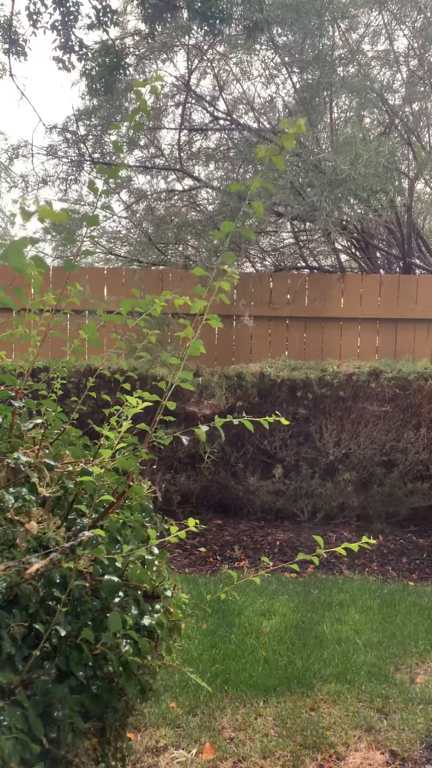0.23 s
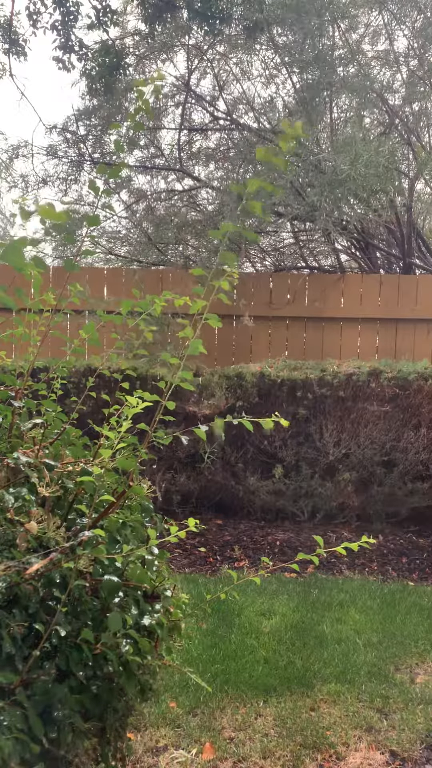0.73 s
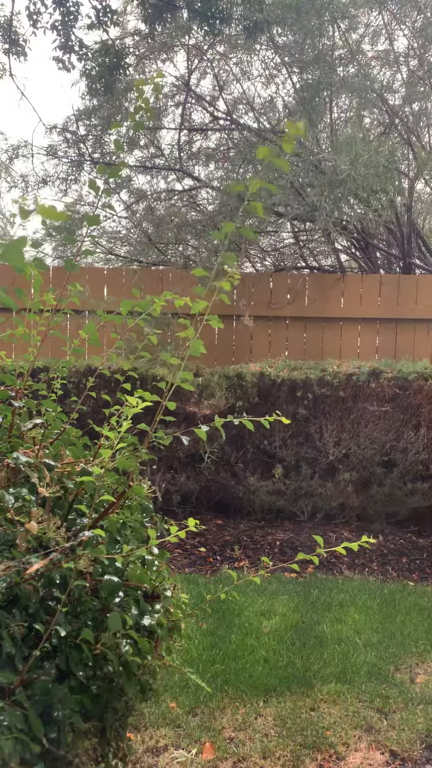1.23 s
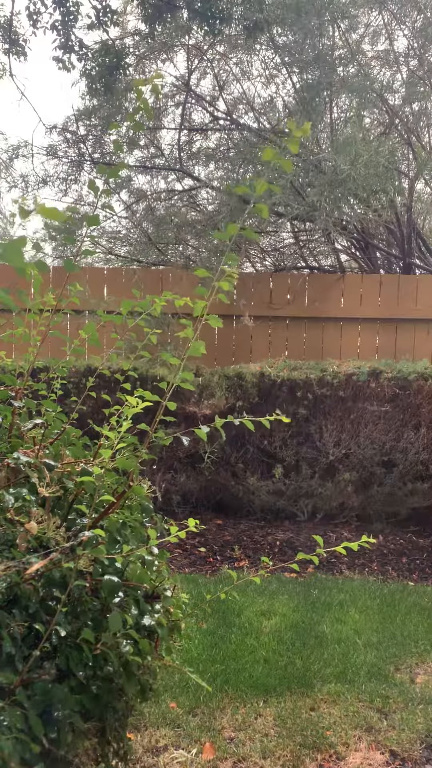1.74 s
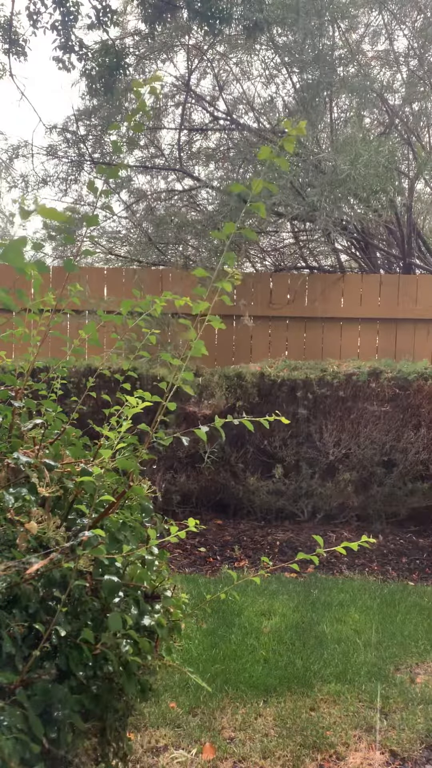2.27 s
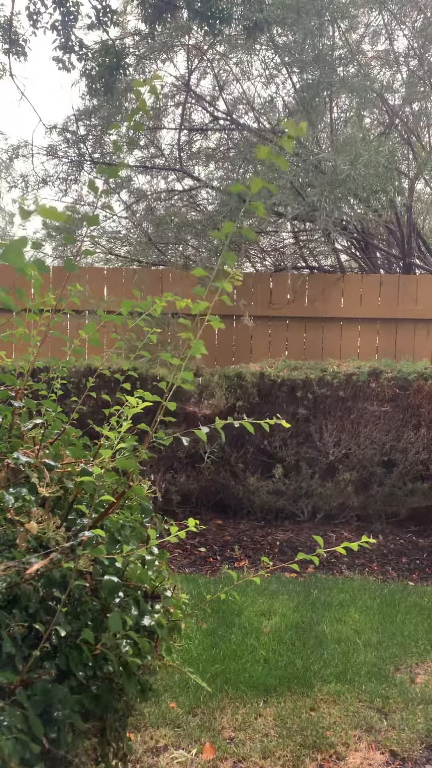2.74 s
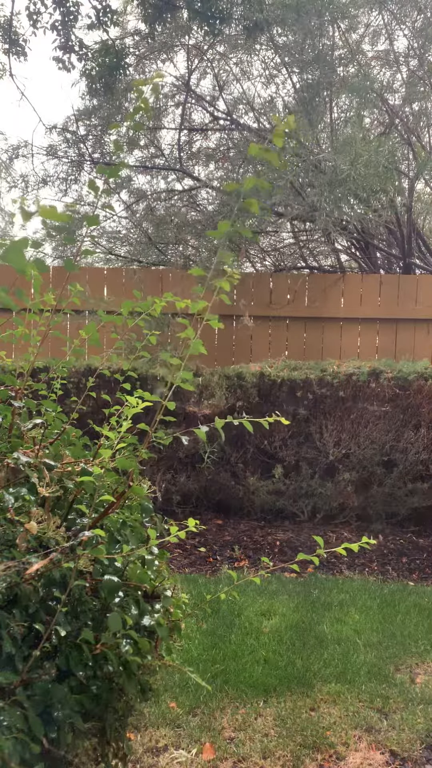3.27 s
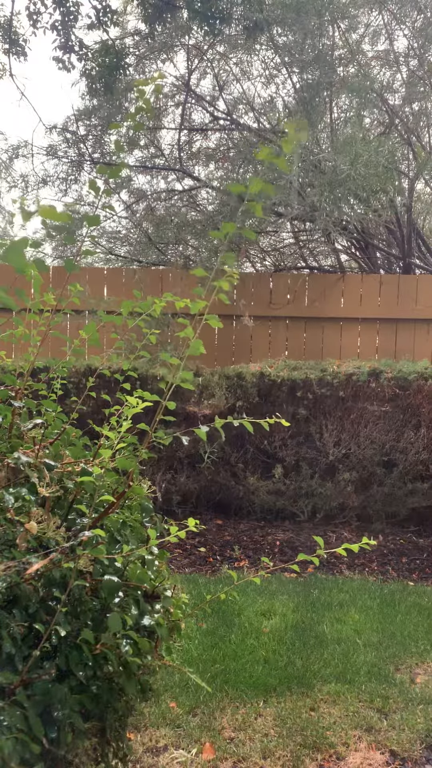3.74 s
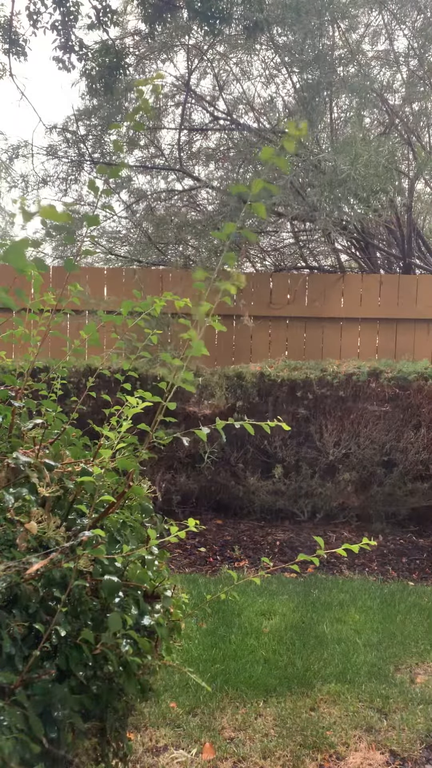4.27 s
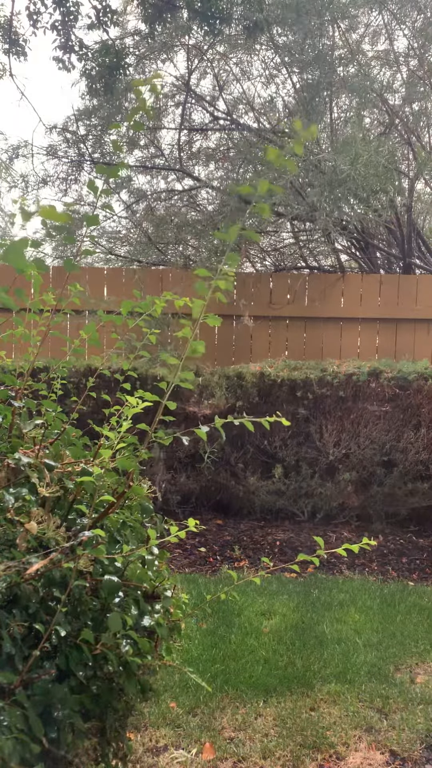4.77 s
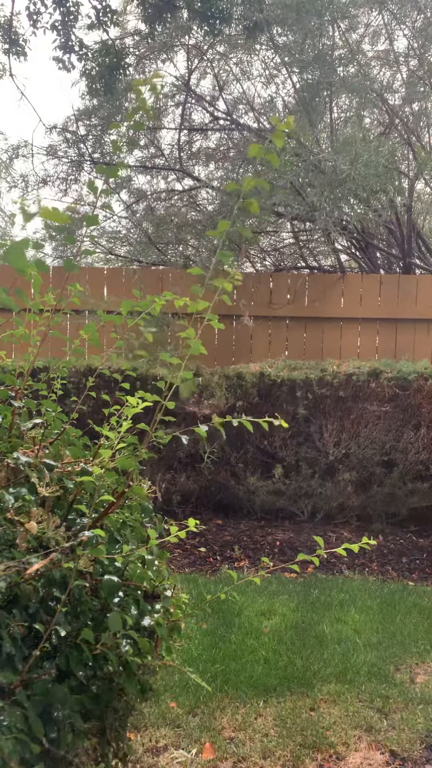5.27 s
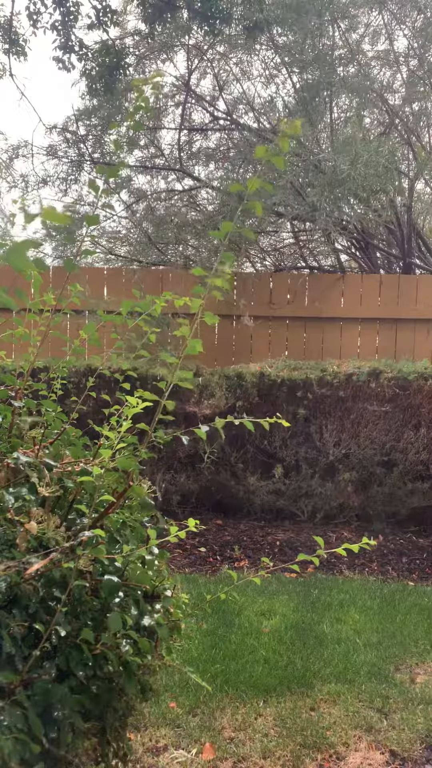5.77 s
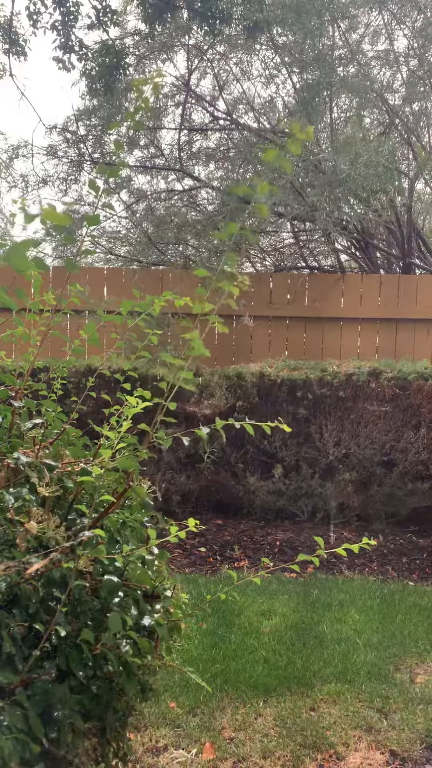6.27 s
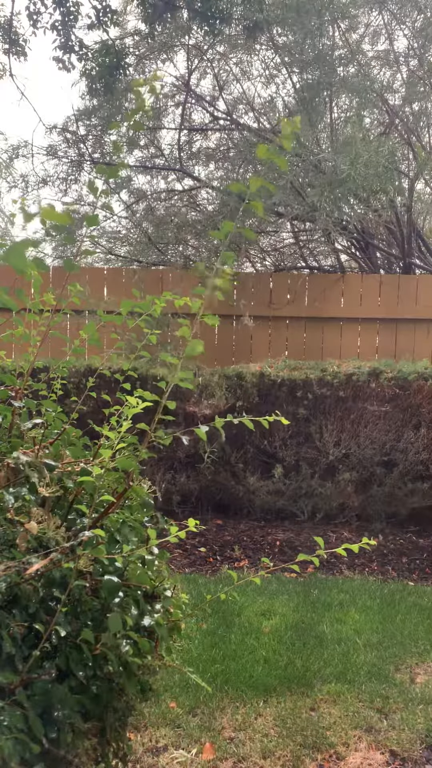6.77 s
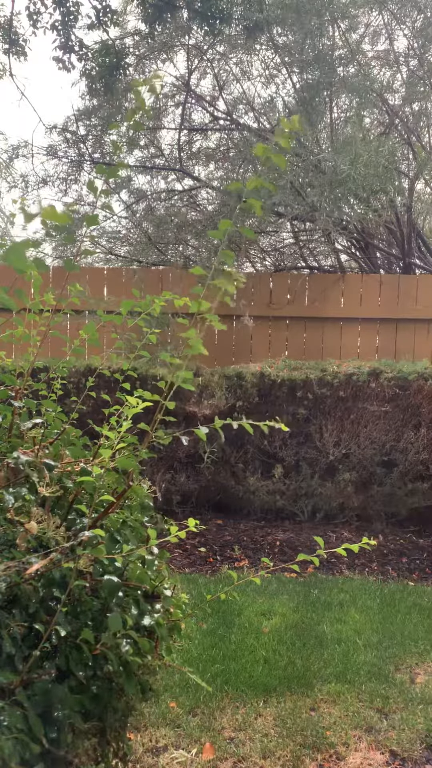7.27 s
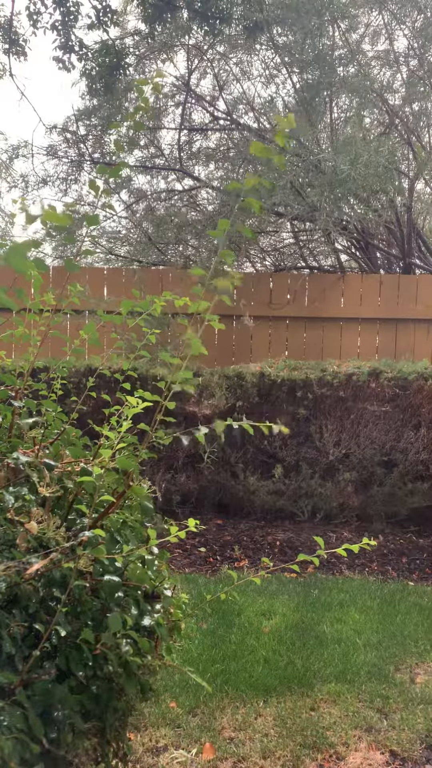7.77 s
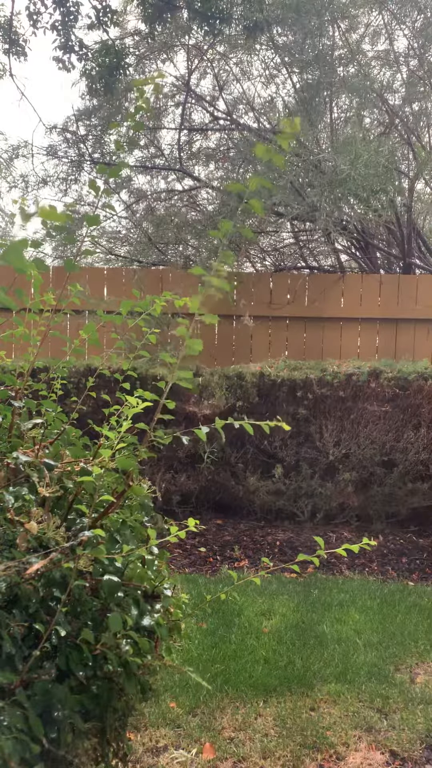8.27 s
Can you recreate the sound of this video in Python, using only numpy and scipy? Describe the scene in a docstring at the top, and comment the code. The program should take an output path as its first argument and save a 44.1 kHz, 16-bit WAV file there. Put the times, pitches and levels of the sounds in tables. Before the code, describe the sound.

Steady rain falls on a backyard, a bright, even hiss with a duller patter beneath it. Close to the microphone, single drops tick sharply on leaves and plop on soaked ground at irregular moments. A low outdoor rumble runs underneath, along with the faint drone of a distant engine that slowly sinks in pitch. It is heard from a sheltered corner beside shrubs and a lawn.

```python
"""A sheltered corner by shrubs and lawn in steady rain, heard by a handheld recorder with two mic ports.
A distant engine drones, its pitch sinking, over low outdoor rumble.
Far drops blend to hiss and patter; near drops tick on leaves and plop on soaked ground.
The rain reaches the left port first, and the corner resonates at a few pitches."""
import sys
import numpy as np
from scipy import signal
from scipy.fft import rfft, irfft, next_fast_len
from scipy.io import wavfile
from scipy.ndimage import uniform_filter1d

SR = 44100
rng = np.random.default_rng(int(sys.argv[2]) if len(sys.argv) > 2 else 0)


def generate_wav(signal):
    """Clip the signal to [-1, 1] and save it as 16-bit WAV at the path in sys.argv[1]."""
    frames = np.transpose(np.atleast_2d(signal))
    scaled = np.clip(frames, -1, 1) * 32767
    pcm = np.round(scaled).astype(np.int16)
    wavfile.write(sys.argv[1], SR, pcm)


N = 375291

# outdoor rumble spectrum [f/Hz, relative level/dB]
RUMBLE_SPECTRUM = [(12, -49), (20, -7.5), (85, -1), (118, -5.5), (145, -6), (215, -8), (245, -9.5),
                   (274, -9), (349, -17), (381, -14.5), (600, -29.5), (780, -76), (1320, -120)]
# engine drone [t/s, f/Hz, level/dB]
ENGINE_TRACK = [(0.0, 122.7, -58), (0.71, 122.1, -50), (1.42, 123.4, -54), (1.99, 112.7, -46),
                (2.44, 109.9, -54), (3.48, 106.1, -44), (3.72, 97.4, -52.5), (5.25, 97.3, -53),
                (6.15, 91.2, -59), (7.4, 92.6, -55.5), (8.5, 98, -57)]
# rain strength, before each layer's offset [t/s, leaf level/dB, ground level/dB]
RAIN_LEVELS = [(0.0, -46.5, -49), (0.6, -46, -48), (2.1, -45.5, -48.5), (2.5, -46.5, -48.5),
               (4.2, -46, -49.5), (5.1, -46, -47.5), (6.3, -46.5, -49), (7.6, -46, -50),
               (8.5, -46.5, -48.5)]
# far rain on leaves [f/Hz, relative level/dB]
HISS_SPECTRUM = [(300, -24), (2000, -15.5), (3000, 0), (5000, 2), (6300, 2.5), (7000, 4), (9500, 0),
                 (11200, 6), (12200, 0), (14000, 1.5), (15750, 3.8), (15900, -39)]
# far rain on ground [f/Hz, relative level/dB]
PATTER_SPECTRUM = [(120, -37), (250, -11), (400, -8), (650, -1.5), (1000, 2.5), (1500, 3), (2000, 3.5),
                   (2600, 3), (3500, -10), (6000, -24)]
# likeness of far rain in the two ports [f/Hz, coherence/0-1]
FAR_COHERENCE = [(150, 0.97), (350, 0.97), (600, 0.64), (1100, 0.41), (1550, 0.82), (2500, 0.01),
                 (3300, 0.62), (4300, 1), (5000, 1), (15000, 1)]
# housing phase turn at the right port, far rain [f/Hz, phase/rad]
FAR_PHASE = [(100, .15), (500, 0.96), (1100, 0.94), (2000, 2.9), (3100, 2.28), (3600, 4.26), (4800, 4.15),
             (15000, 4.22)]
# housing phase turn at the right port, near drops [f/Hz, phase/rad]
NEAR_PHASE = [(100, 0.16), (700, 0.043), (1500, 1.65), (2800, 2), (3700, 3.75), (15000, 3.8)]
# loud drops on soaked ground [t/s, level/dB, f/Hz, spatter/0-1]
GROUND_DROPS = [(0.058, -31, 1730, 0.5), (0.09, -25.5, 1740, 0.9), (0.194, -33, 1900, 0.4),
                (0.276, -32, 2150, 0.7), (0.399, -32, 1690, 0.46), (0.4268, -29, 1000, 0.7),
                (0.428, -27.5, 524, 0.48), (0.504, -31, 1740, 0.7), (0.749, -38, 1820, 0.46),
                (0.827, -30, 2040, 0.46), (0.897, -24.5, 2380, 0.8), (1.118, -38, 1370, 0.46),
                (1.253, -30.5, 1680, 0.3), (1.333, -31, 2060, 0.46), (1.486, -31, 1580, 0.8),
                (1.567, -32.5, 1520, 0.46), (1.745, -32.5, 1310, 0.6), (1.811, -28.5, 1920, 0.7),
                (1.862, -30, 1610, 0.46), (1.941, -29, 1600, 0.6), (2.005, -31, 1470, 0.7),
                (2.013, -27, 3000, 1.0), (2.06, -24, 4300, 1.0), (2.117, -34, 1250, 0.46),
                (2.186, -30, 1680, 0.46), (2.289, -32, 1150, 0.46), (2.803, -37.5, 374, 0.46),
                (2.962, -34, 1220, 0.5), (3.038, -40, 747, 0.4), (3.153, -28.5, 1580, 0.73),
                (3.344, -29, 2020, 0.3), (3.421, -30, 1500, 0.9), (3.434, -34, 1800, 0.9),
                (3.434, -29.5, 1250, 0.9), (3.707, -37.5, 1000, 0.7), (3.871, -37, 1350, 0.4),
                (4.051, -33, 1310, 0.6), (4.181, -32, 1910, 0.5), (4.471, -30, 2170, 0.7),
                (4.587, -36.5, 445, 0.6), (4.884, -31, 1600, 0.7), (4.997, -24, 3560, 0.7),
                (5.185, -24.5, 1220, 0.75), (5.236, -36, 1290, 0.46), (5.341, -31.5, 1140, 0.46),
                (5.522, -31.5, 1480, 0.4), (5.732, -34, 1590, 0.46), (5.748, -28.5, 1678, 0.4),
                (5.941, -31, 993, 0.75), (6.372, -30, 2060, 0.46), (6.447, -36, 1310, 0.5),
                (6.647, -18, 3900, 0.3), (6.941, -31, 1980, 0.46), (7.184, -31.5, 1210, 0.9),
                (7.235, -28, 1520, 0.9), (7.581, -32.5, 1610, 0.6), (7.763, -26, 3580, 0.7),
                (8.04, -31, 2220, 0.46), (8.288, -33, 1460, 0.46), (8.472, -28.5, 1510, 0.6)]
# loud drops on leaves [t/s, level/dB, centre f/Hz, width/octaves]
LEAF_DROPS = [(0.0143, -35, 8700, 0.45), (0.0702, -32.5, 10700, 0.54), (0.0752, -32.9, 13000, 0.27),
              (0.1949, -29, 9300, 0.54), (0.2312, -29.5, 7700, 0.21), (0.3113, -28, 10500, 0.31),
              (0.4512, -36, 6000, 0.5), (0.5053, -23.5, 12800, 0.4), (0.5283, -24.5, 11000, 0.43),
              (0.5676, -27, 7300, 0.52), (0.5709, -31, 12200, 0.38), (0.5927, -27, 8600, 0.42),
              (0.6465, -29, 7700, 0.61), (0.9287, -25.5, 9100, 0.44), (0.972, -27, 10400, 0.49),
              (1.0637, -32.5, 11100, 0.3), (1.0927, -32, 13480, 0.47), (1.153, -31, 10200, 0.48),
              (1.1879, -31, 8400, 0.39), (1.202, -26.3, 9000, 0.37), (1.2546, -26.8, 13500, 0.26),
              (1.459, -26, 7000, 0.6), (1.5827, -32, 11600, 0.4), (1.6237, -23, 10400, 0.55),
              (1.6301, -25, 8500, 0.34), (1.6647, -25, 10200, 0.45), (1.835, -25.2, 9700, 0.62),
              (1.8459, -31, 10500, 0.43), (1.8866, -31.7, 7700, 0.33), (1.9067, -18.5, 7440, 0.35),
              (1.934, -30, 12600, 0.36), (1.9595, -26.5, 8100, 0.34), (2.0564, -24.5, 4650, 0.22),
              (2.1193, -25, 8300, 0.25), (2.1241, -27, 14800, 0.25), (2.1305, -33, 8900, 0.55),
              (2.1624, -34, 9100, 0.35), (2.1903, -25.5, 10000, 0.24), (2.2012, -26.5, 9100, 0.58),
              (2.3532, -27, 10400, 0.35), (2.3651, -30.9, 9100, 0.34), (2.3716, -29, 11100, 0.21),
              (2.3871, -30, 12600, 0.46), (2.4498, -29, 7000, 0.46), (2.4759, -26.5, 10300, 0.53),
              (2.511, -24, 14200, 0.27), (2.5357, -25.5, 10100, 0.34), (2.6179, -30, 12100, 0.42),
              (2.6585, -31.4, 6800, 0.8), (2.736, -29, 9700, 0.4), (2.8139, -29, 10500, 0.54),
              (3.0405, -28, 10100, 0.57), (3.0785, -29, 9400, 0.39), (3.1115, -35, 8100, 0.63),
              (3.1452, -28, 9900, 0.52), (3.1715, -28, 9600, 0.37), (3.1743, -28, 12120, 0.43),
              (3.1956, -29, 10200, 0.76), (3.2484, -22.5, 7400, 0.28), (3.2515, -29, 11400, 0.41),
              (3.3428, -25.5, 11080, 0.52), (3.3804, -29.1, 11300, 0.35), (3.3895, -33, 8500, 0.33),
              (3.396, -29, 9100, 0.38), (3.427, -28, 9500, 0.38), (3.5286, -32, 7000, 0.29),
              (3.5424, -29, 8500, 0.3), (3.646, -29, 11100, 0.45), (3.7093, -26, 13000, 0.63),
              (3.7174, -36, 12000, 0.54), (3.7584, -29, 12400, 0.4), (3.7727, -25.5, 7560, 0.31),
              (3.7961, -28, 13000, 0.39), (3.8386, -30, 10100, 0.29), (3.8494, -30, 12000, 0.18),
              (4.2184, -28.5, 9200, 0.63), (4.2542, -27, 10700, 0.46), (4.4273, -30, 8400, 0.41),
              (4.4408, -35, 11000, 0.45), (4.4734, -36, 7900, 0.76), (4.5309, -33, 7600, 0.47),
              (4.5747, -27, 9700, 0.24), (4.6666, -30, 12600, 0.35), (4.829, -33, 11480, 0.51),
              (4.872, -24, 11600, 0.32), (4.8752, -33, 10500, 0.48), (4.9032, -25, 12700, 0.34),
              (4.9422, -28, 11500, 0.17), (4.9513, -33, 8000, 0.3), (4.9533, -14, 11400, 0.24),
              (4.9556, -28, 10800, 0.33), (4.9583, -35, 10900, 0.17), (4.9851, -27, 10500, 0.34),
              (5.1085, -34, 11400, 0.29), (5.1419, -25.5, 9700, 0.47), (5.3974, -32, 10800, 0.45),
              (5.5246, -31, 8800, 0.81), (5.5848, -25.5, 11000, 0.32), (5.6921, -33, 8300, 0.2),
              (5.7492, -27, 11700, 0.34), (5.8074, -28.5, 10800, 0.29), (6.0819, -33, 10300, 0.56),
              (6.0962, -34, 13000, 0.4), (6.0984, -24.5, 14000, 0.28), (6.1414, -34, 6500, 0.5),
              (6.214, -29, 9700, 0.31), (6.4799, -30, 11100, 0.37), (6.5915, -28, 9700, 0.36),
              (6.6249, -26, 11800, 0.21), (6.6498, -23, 6500, 0.69), (6.7103, -25, 9100, 0.63),
              (6.7354, -27, 11000, 0.46), (6.942, -28, 14500, 0.31), (6.9506, -32, 7400, 0.57),
              (6.9916, -21.5, 12600, 0.33), (7.0046, -29, 9500, 0.36), (7.1124, -29, 8200, 0.54),
              (7.1921, -24.5, 9200, 0.5), (7.3143, -34, 11400, 0.38), (7.3311, -34, 8400, 0.62),
              (7.4164, -30, 11700, 0.47), (7.4316, -28.5, 12400, 0.43), (7.4822, -31, 10200, 0.48),
              (7.5165, -26.5, 7900, 0.26), (7.5895, -27.5, 6800, 0.26), (7.7391, -29, 12500, 0.39),
              (7.7983, -31, 8300, 0.49), (7.846, -28, 9600, 0.5), (7.947, -31, 8400, 0.5),
              (7.98, -33, 11000, 0.53), (8.0457, -40, 13100, 0.33), (8.106, -28.5, 9600, 0.46),
              (8.2166, -37, 11500, 0.54), (8.2491, -30, 10100, 0.49), (8.2887, -37, 11600, 0.46),
              (8.3117, -31, 10800, 0.32), (8.407, -29, 11000, 0.51), (8.449, -33.0, 11500, 0.45)]
# top end of a tick [f/Hz, gain/dB]
TICK_ROLLOFF = [(20, 0), (16000, 0), (17000, -30)]
# resonances of the corner [f/Hz, width/Hz, gain/dB]
CORNER_MODES = [(765, 40, 2.5), (1001, 40, 2.5), (1140, 40, 2.5), (1301, 22, 5), (1470, 55, 3.5),
                (1572, 50, 3.5), (1685, 45, 3), (1920, 40, 3.5), (2059, 35, 2.5), (2524, 30, 3)]
# treble drops steeply above 15.8 kHz [f/Hz, gain/dB]
TOP_CUT = [(20, 0), (15750, 0), (15850, -14), (16500, -15)]

TICK_ONSET_S, BLIP_CENTRE_S, PLOP_RISE_S = .0009, .0055, .0027


def gain_of(db):
    """dB to gain."""
    return 10 ** (np.asarray(db) / 20)


def unit_rms(x):
    """Scale to rms 1."""
    return x / np.sqrt(np.mean(x ** 2) + 1e-20)


def at_hz(table, hz):
    """Interpolate a table along log frequency."""
    f, value = np.transpose(table)
    return np.interp(np.log(hz + 1), np.log(f + 1), value)


def curve(table, column):
    """One column of a time table at every sample."""
    rows = np.array(table)
    return np.interp(np.arange(N) / SR, rows[:, 0], rows[:, column])


def add(mix, start_s, sound):
    """Mix a sound in at start_s."""
    part = mix[max(round(start_s * SR), 0):][:len(sound)]
    part += sound[:len(part)]


def to_right(hz, phase_table, lag_s=1 / 4200):
    """Left port to right: extra path delay plus the housing's phase turn."""
    return np.exp(1j * (at_hz(phase_table, hz) - 2 * np.pi * hz * lag_s))


def rumble(level_db=-49.0):
    """Low neighbourhood noise; the ports differ more as the wavelength shortens."""
    hz = np.fft.rfftfreq(N, 1 / SR)
    mid, side = rfft(rng.standard_normal((2, N))) * gain_of(at_hz(RUMBLE_SPECTRUM, hz))
    side *= np.clip((hz / 700) ** 2.08, 0, .6)
    return gain_of(level_db) * unit_rms(irfft(np.array([mid + side, mid - side]), N))


def engine_drone():
    """One low order of a distant engine: a gliding sine."""
    phase = 2 * np.pi * np.cumsum(curve(ENGINE_TRACK, 1)) / SR
    return np.sqrt(2) * gain_of(curve(ENGINE_TRACK, 2)) * np.sin(phase)


def far_noise(spectrum, patch_db, flicker_db):
    """Noise with brief narrow-band patches and a quicker broadband flicker, partly alike in both ports."""
    frames, hz = N // 128 + 5, np.fft.rfftfreq(512, 1 / SR)
    re, im, own_re, own_im, patches, flicker = rng.standard_normal((frames, 257, 6)).T
    patches = unit_rms(uniform_filter1d(uniform_filter1d(patches, 6, axis=0), 9, axis=1))
    flicker = unit_rms(uniform_filter1d(uniform_filter1d(flicker, 170, axis=0), 4, axis=1))
    coherence = np.clip(at_hz(FAR_COHERENCE, hz), 0, 1)[:, None]
    left = re + 1j * im
    right = coherence * left * to_right(hz, FAR_PHASE)[:, None]
    right += np.sqrt(1 - coherence ** 2) * (own_re + 1j * own_im)
    shape_db = at_hz(spectrum, hz)[:, None] + patch_db * patches + flicker_db * flicker
    _, pair = signal.istft(np.array([left, right]) * gain_of(shape_db), nperseg=512, noverlap=384)
    return unit_rms(pair[:, :N])


def far_rain():
    """Countless far drops blend to a hiss on leaves and a duller patter on the ground."""
    hiss = far_noise(HISS_SPECTRUM, patch_db=3.06, flicker_db=1.98)
    patter = far_noise(PATTER_SPECTRUM, patch_db=2.6, flicker_db=1.5)
    return gain_of(curve(RAIN_LEVELS, 1) + 5.0) * hiss + gain_of(curve(RAIN_LEVELS, 2)) * patter


def blip(hz, width_cycles=1.58, sink=.4):
    """A soft-edged burst of a few cycles, sinking in pitch."""
    cycles = (np.arange(600) / SR - BLIP_CENTRE_S) * hz
    phase = 2 * np.pi * (cycles - sink * cycles ** 2 / (2 * width_cycles))
    return np.sin(phase) * np.exp(-(2 * cycles / width_cycles) ** 2)


def plop(hz, spatter, decay_s=.036, gap_scale_s=.0022, delay_s=.004):
    """A drop hits soaked ground: one blip, then smaller ones as it spatters."""
    out = np.zeros(6000)
    add(out, 0, blip(hz))
    gaps, pitches, sizes = rng.random((24, 3)).T
    times_s = delay_s + np.cumsum(gap_scale_s * (.3 - np.log(gaps + .0011)))
    for start_s, pitch, size in zip(times_s, pitches, sizes):
        gain = spatter * np.exp(-start_s / decay_s) * (.3 + .7 * size)
        add(out, start_s, gain * blip(hz * (.85 + .45 * pitch)))
    return out


def tick(hz, width_oct, spray_db, snap_s=.00045, spray_s=.011, skirt_db=-17, skirt_hz=2000):
    """A drop snaps on a leaf: a click and brief rattle, then fine spray, all coloured by the leaf."""
    n = 1600
    t = np.arange(n) / SR
    snap, spray, grain = rng.standard_normal((3, n))
    snap = snap * np.exp(-(t - TICK_ONSET_S) / snap_s) * (t > TICK_ONSET_S)
    snap[round(TICK_ONSET_S * SR)] += 2.9  # the click
    clumps = unit_rms(1.4 + uniform_filter1d(grain, 30) ** 2 * 20)
    spray = spray * clumps * np.exp(-t / spray_s) * (t > TICK_ONSET_S)
    f = np.fft.rfftfreq(2 * n, 1 / SR)
    band = np.exp(-(np.log2((f + 1) / hz) / (2 * width_oct)) ** 2)
    skirt = gain_of(skirt_db) * f ** 2 / (f ** 2 + skirt_hz ** 2)
    leaf = (band + skirt) * gain_of(at_hz(TICK_ROLLOFF, f))
    snap, spray = irfft(rfft([snap, spray], 2 * n) * leaf)[:, :n]
    snap /= np.sqrt((snap ** 2).sum() / (SR / 1000))  # energy of 1 ms at rms 1
    spray /= np.sqrt((spray[:600] ** 2).mean())
    return snap + gain_of(spray_db) * spray


def shower(sounds, rate_per_s, spread_db, max_spreads):
    """Each sound is struck by its own sparse train of drops; few are large."""
    out = np.zeros(N)
    for sound in sounds:
        chance, size, sign = rng.random((N, 3)).T
        size_db = spread_db * np.minimum(-np.log(size + 1e-9), max_spreads)
        hits = chance < rate_per_s / len(sounds) / SR
        out += signal.oaconvolve(hits * gain_of(size_db) * np.sign(sign - .5), sound)[:N]
    return unit_rms(out)


def near_drops():
    """Drops on leaves and ground: loud ones placed singly, lesser ones at random."""
    out = np.zeros(N)
    for start_s, db, hz, width_oct in LEAF_DROPS:
        add(out, start_s - TICK_ONSET_S, gain_of(db) * tick(hz, width_oct, spray_db=-16))
    for start_s, db, hz, spatter in GROUND_DROPS:
        add(out, start_s + PLOP_RISE_S - BLIP_CENTRE_S, gain_of(db) * plop(hz, spatter))
    ticks = [tick(hz, width_oct=.56, spray_db=-22.5) for hz in np.geomspace(3500, 15000, 24)]
    plops = [plop(hz, spatter=.29) for hz in np.geomspace(450, 3600, 16)]
    near_leaves = gain_of(-4.5) * shower(ticks, rate_per_s=400, spread_db=11.4, max_spreads=2.1)
    mid_leaves = gain_of(-11.0) * shower(ticks, rate_per_s=1800, spread_db=4.0, max_spreads=3.8)
    ground = gain_of(-9.0) * shower(plops, rate_per_s=400, spread_db=2.1, max_spreads=3.1)
    out += gain_of(curve(RAIN_LEVELS, 1)) * (near_leaves + mid_leaves)
    return out + gain_of(curve(RAIN_LEVELS, 2)) * ground


def both_ports(left, tail_db=-12, decay_s=.018):
    """Near sound reaches both ports, each with its own short tail scattered by foliage."""
    size = next_fast_len(N + 64)
    hz = np.fft.rfftfreq(size, 1 / SR)
    right = irfft(rfft(left, size) * to_right(hz, NEAR_PHASE), size)[:N]
    out, t = np.array([left, right]), np.arange(5000) / SR
    for k in range(3):  # drops land in changing places: three tails crossfade
        tail = rng.standard_normal((2, len(t))) * np.exp(-t / decay_s) * (t > .001)
        tail /= np.linalg.norm(tail, axis=1, keepdims=True)
        fade = np.sqrt(2 / 3) * np.cos(np.pi * (k / 3 + 7.3 * np.arange(N) / SR))
        out += gain_of(tail_db) * signal.oaconvolve((left * fade)[None], tail, axes=1)[:, :N]
    return out


def corner_resonance(x):
    """Narrow lifts where the sheltered corner resonates."""
    size = next_fast_len(N + 4096)
    hz = np.fft.rfftfreq(size, 1 / SR)
    lift = 1 + sum((gain_of(db) - 1) / (1 + 2j * (hz - mode_hz) / width_hz)
                   for mode_hz, width_hz, db in CORNER_MODES)
    return irfft(rfft(x, size) * lift, size)[:, :N]


def scene():
    """Near and far rain in the corner, over rumble and drone."""
    rain = both_ports(near_drops()) + far_rain()
    return corner_resonance(rain) + rumble() + engine_drone()


def record(dry):
    """Steep top cut, then band limit."""
    size = next_fast_len(N + 1024)
    top_cut = gain_of(at_hz(TOP_CUT, np.fft.rfftfreq(size, 1 / SR)))
    shaped = irfft(rfft(dry, size) * top_cut, size)[:, :N]
    lowpass = signal.firwin(301, cutoff=16550, window=("kaiser", 9), fs=SR)
    return signal.oaconvolve(shaped, lowpass[None], "same")


dry = scene()
out = record(dry)
generate_wav(out)
```